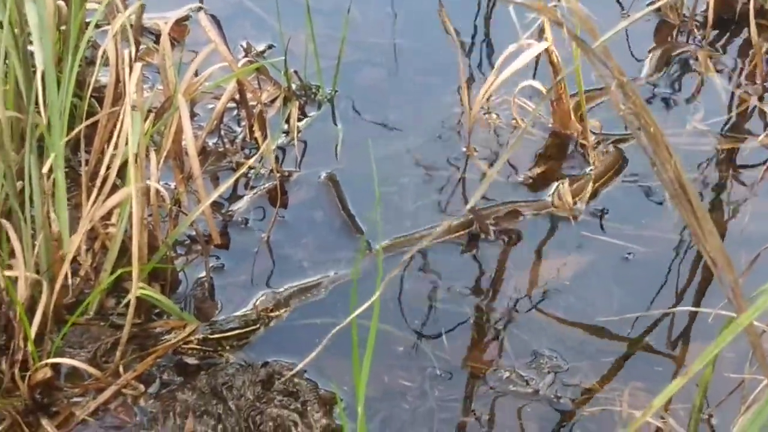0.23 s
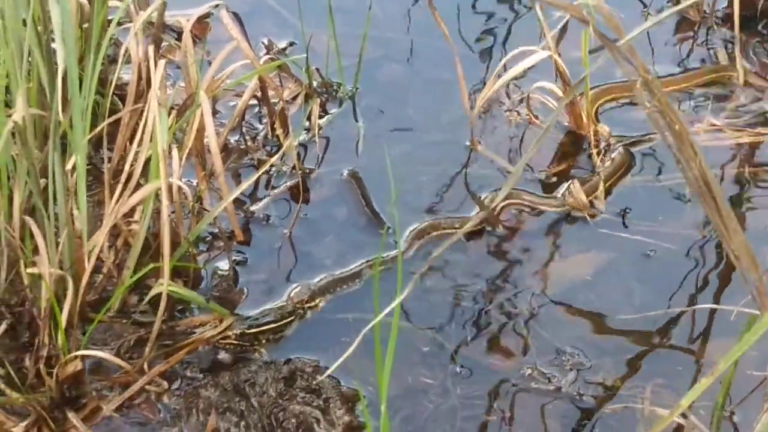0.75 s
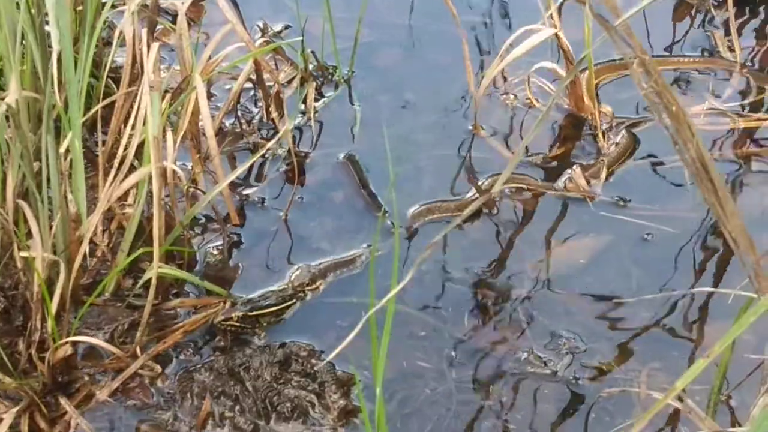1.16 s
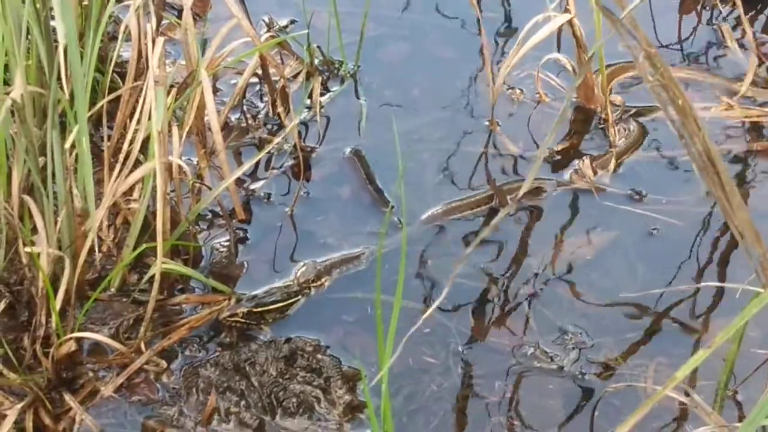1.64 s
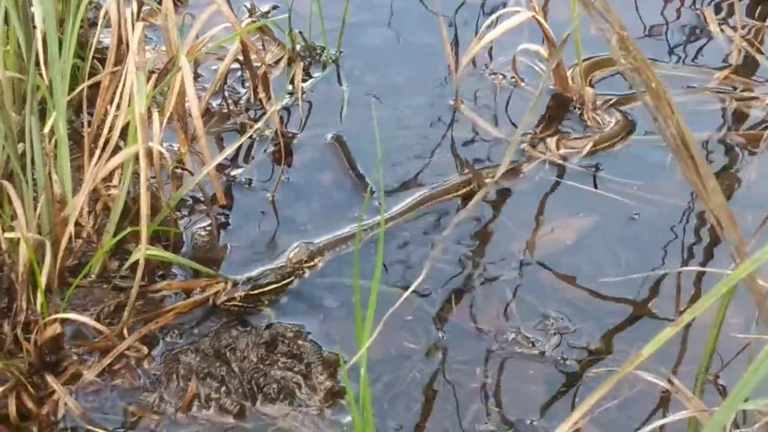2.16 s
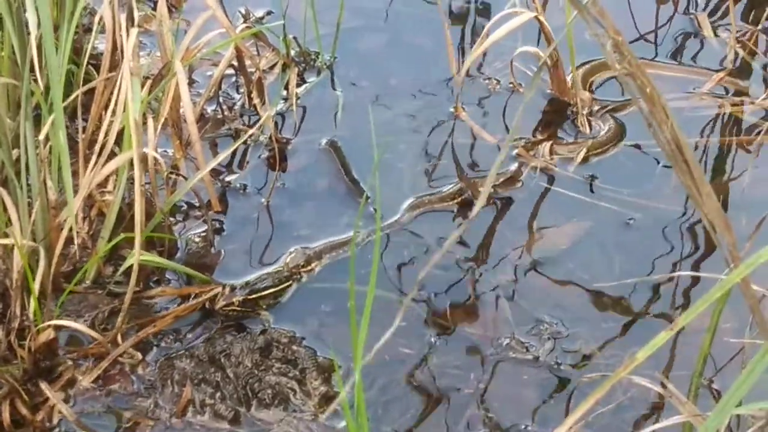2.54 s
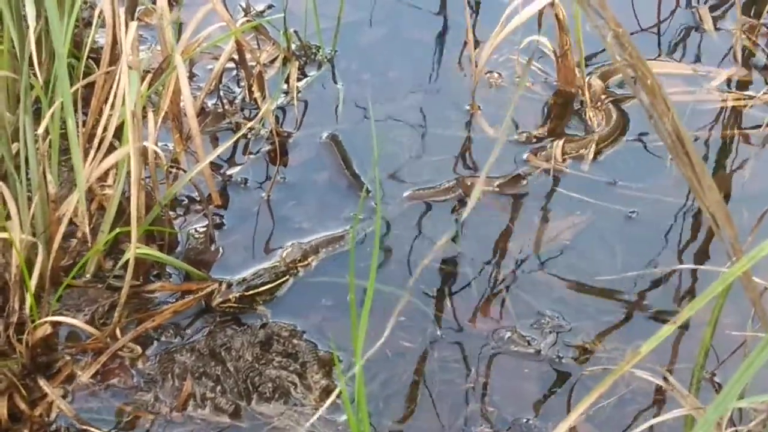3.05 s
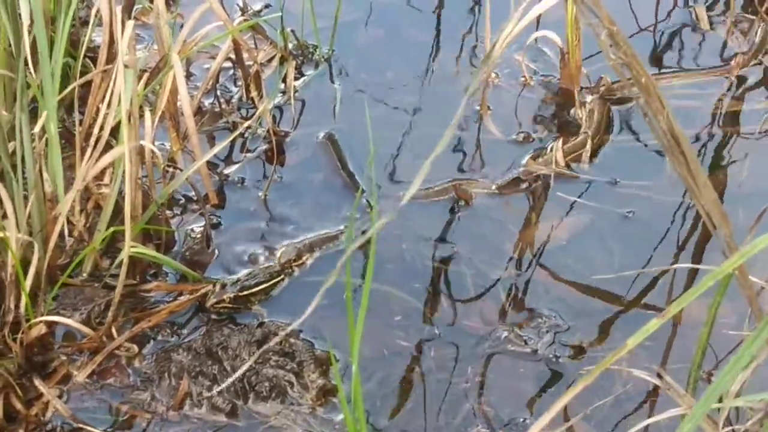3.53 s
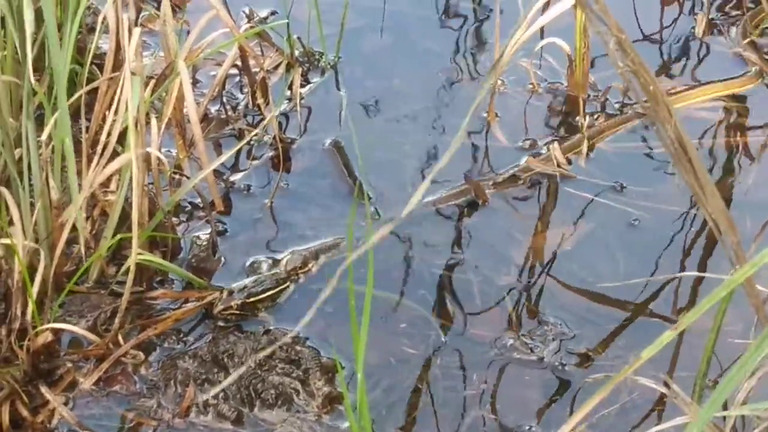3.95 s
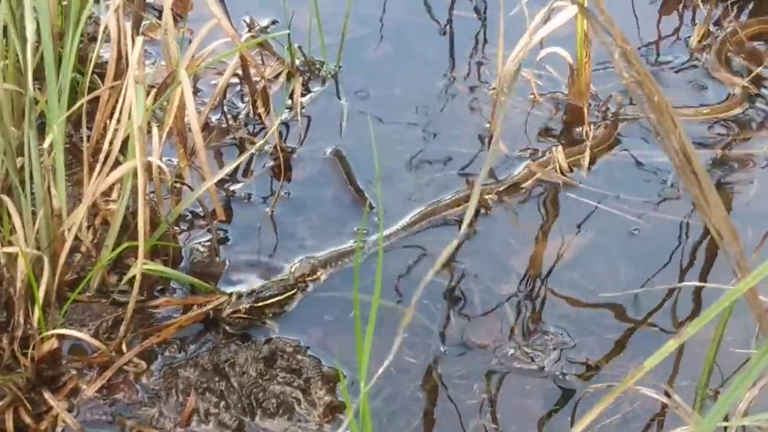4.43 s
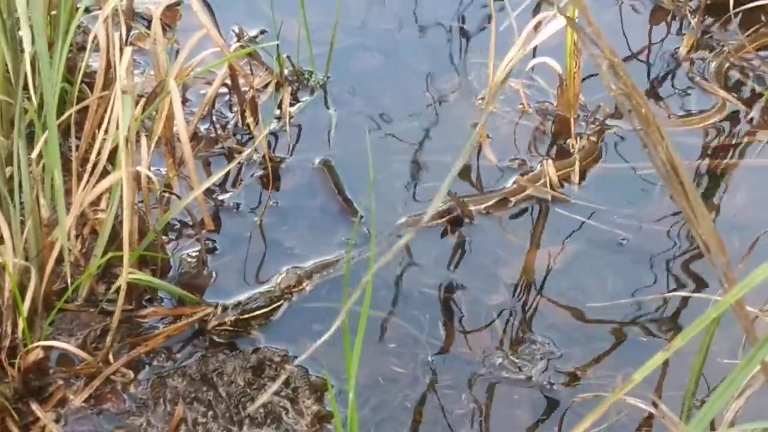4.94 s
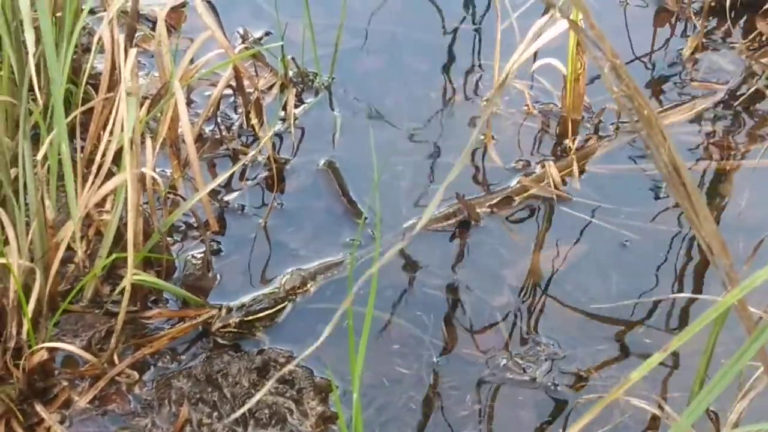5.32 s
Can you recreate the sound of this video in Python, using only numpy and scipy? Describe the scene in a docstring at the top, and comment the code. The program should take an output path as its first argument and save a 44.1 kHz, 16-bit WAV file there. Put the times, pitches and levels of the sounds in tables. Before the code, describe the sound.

Close stereo phone capture of a small frog's distress cries: thin whistling tones near three kilohertz, jumping and breaking into rasp, wrapped in bright airy hiss. The cries come in bursts with brief pauses, most crowded around two to three seconds. Afterwards only faint open-air hush, slight reed rustle, tiny clicks and dull wind thumps in the far channel remain, with a very faint puff near the end.

```python
"""A frog gripped by a snake screams at a reedy pond edge, a metre from a phone whose left port faces it.
Its vocal folds whistle, jump in pitch and break into rasp; pushes of air hiss and rasp through its throat.
Fine hiss and rustle swell, reeds tick with short rings, and band-limited noise makes wind buffet the far port.
Faint outdoor hush lies under it all; stems and water scatter the frog and reeds as decaying noise."""
import sys
import numpy as np
from scipy import signal
from scipy.fft import rfft, irfft
from scipy.io import wavfile
from scipy.ndimage import uniform_filter1d, map_coordinates

SR = 44100
rng = np.random.default_rng(int(sys.argv[2]) if len(sys.argv) > 2 else 0)


def master(y):
    """Save y as 16-bit WAV."""
    cut = np.clip(np.atleast_2d(y).T, -1, 1)
    pcm = np.round(cut * 32767)  # scale
    wavfile.write(sys.argv[1], SR, pcm.astype(np.int16))


N = 246078
TOP_HZ = 15900  # top of the phone's range

CLEAR, HUSKY, STRAINED, TORN = .07, .33, .6, .85  # roughness of the folds' swing, 0-1


def undb(db):
    """Amplitude factor for a level in dB."""
    return 10 ** (np.asarray(db) / 20)


def unit(x):
    """Scale to an RMS of 1."""
    return x / np.sqrt(np.mean(np.abs(x) ** 2))


def butter(x, order, hz, kind="low"):
    """Smooth-edged filter that keeps the lows, the highs or a band."""
    return signal.sosfilt(signal.butter(order, hz, kind, fs=SR, output="sos"), x)


def wobble(hz):
    """Smooth noise that changes about hz times a second."""
    return unit(butter(rng.standard_normal(N), 4, hz))


def ring(x, hz, width_hz):
    """Resonance with gain 1 at its centre."""
    return signal.lfilter(*signal.iirpeak(hz, hz / width_hz, fs=SR), x)


def steep_ring(x, hz, width_hz):
    """The same resonance twice over, for steeper sides, at an RMS of 1."""
    return unit(ring(ring(x, hz, width_hz), hz, width_hz))


def drift(x, sway_s=.0005):
    """A wandering delay bends every resonance up and down by some percent."""
    delayed = np.arange(N) + sway_s * SR * wobble(14)
    return map_coordinates(x, [delayed], order=2, mode="mirror")


def body(x, modes):
    """Steep resonances side by side, each drifting, coming and going."""
    total = 0
    for k, (hz, width_hz, db) in enumerate(modes):
        mode = drift(steep_ring(x, hz, width_hz)) * undb(3.8 * wobble(12))
        total = total + (-1) ** k * undb(db) * mode
    return unit(total)


def colour(x, hz, gain):
    """Gain by frequency, straight on a log axis."""
    axis = np.log(np.arange(N // 2 + 1) * SR / N + 1)
    return irfft(rfft(x) * np.interp(axis, np.log(hz), gain), N)


def open_between(start, end, fade_s):
    """Gate that is open from start to end, with short fades."""
    t = np.arange(N) / SR
    return np.clip(np.minimum(t - start, end - t) / fade_s + .5, 0, 1)


def play(tables, fade_s=.0015):
    """Columns of all tables on one time line, with a gate that is open while a table lasts."""
    gate = sum(open_between(rows[0][0], rows[-1][0], fade_s) for rows in tables)
    s, *columns = np.concatenate(tables).T
    t = np.arange(N) / SR
    return [np.minimum(gate, 1)] + [np.interp(t, s, column) for column in columns]


def swells(rows):
    """Gain of events that rise and fall at a steady number of dB a second."""
    t = np.arange(N) / SR
    total = 0
    for s, db, rise_s, fall_s in rows:
        total = total + undb(db - 10 * np.abs(t - s) / np.where(t < s, rise_s, fall_s))
    return total


def whine():
    """A thin tone near 9 kHz, slightly unsteady: noise through a narrow resonance."""
    return steep_ring(rng.standard_normal(N), 8960, 90)


def air():
    """Faint outdoor hush, different noise at each port, with a thin tone at the near one."""
    # colour of the hush before its bass is cut: (frequency [Hz], relative level [dB])
    hush_colour = [(18, -5), (30, -11), (90, -1.5), (439, -19), (2910, -22.5), (4170, -26), (7890, -22),
                   (8970, -13.5), (13500, -39)]
    hz, db = np.transpose(hush_colour)
    hush = colour(rng.standard_normal((2, N)), hz, undb(db))
    port_db = [[3], [-1]]  # near, far
    hush = unit(butter(hush, 2, 200, "high")) * undb(port_db)
    hush[0] += undb(-9) * whine()
    return undb(-77 + 1.5 * wobble(0.71)) * hush


def wind():
    """Each gust sets the far port thudding near 60 Hz; the sheltered port only flutters."""
    # gusts that strike the far port: (time [s], peak level before the last filter [dB])
    buffets = [(2.463, -53), (2.59, -53), (2.704, -52.5), (3.061, -34.5), (3.31, -40.5), (3.398, -43),
               (3.63, -40.5), (3.678, -36.5), (3.71, -35), (3.826, -51), (3.959, -34), (4.194, -41.5),
               (4.26, -39), (4.576, -51.5), (4.717, -36.5), (4.787, -42), (5.15, -50.5), (5.296, -44),
               (5.348, -33), (5.402, -48), (5.527, -34.5)]
    t = np.arange(N) / SR
    size = np.array([undb(-75.5 + 5 * wobble(4)), undb(-72 + 5.6 * wobble(3.6))])
    # six small gusts as the breeze gets up
    from_s, to_s, small_db, spread_db = 1.85, 2.9, -59, 2
    when, strength = rng.random((6, 2)).T
    small = zip(from_s + (to_s - from_s) * when, small_db + spread_db * (2 * strength - 1))
    for s, db in [*buffets, *small]:
        width_s = np.where(t < s, .012, .025)
        size[1] += undb(db) * np.exp(-((t - s) / width_s) ** 2)
    push = butter(ring(rng.standard_normal((2, N)), 62, 63), 2, 200)
    # the flow is kept at an even strength so that the gusts alone shape it
    push = size * push / np.sqrt(uniform_filter1d(push ** 2, size=2500))
    return butter(push, 2, [42, 105], "band")


def folds(notes, shake_hz):
    """A near sine, loudest where it meets the mouth resonance; strain trades steady swing for unsteady."""
    # overtones: (multiple of the pitch, level at a 3 kHz pitch [dB])
    overtones = [(2, -23), (3, -36.5)]
    # every second swing differs: (start [s], end [s], half-pitch lines re the note [dB])
    doubling = [(2.345, 2.385, -2), (3.04, 3.112, -10), (3.114, 3.15, 16), (3.152, 3.19, 3)]
    mouth_hz, mouth_width_hz, mouth_db = 2830, 320, 20

    gate, hz, db, rough = play([[(*point, strain) for point in note] for strain, note in notes])
    doubled, half_db = play([[(start, over), (end, over)] for start, end, over in doubling], fade_s=0.0053)
    phase = np.cumsum(2 * np.pi * hz * (1 + (0.0073 + .03 * rough) * wobble(90)) / SR)

    unsteady = (wobble(shake_hz) + 1j * wobble(shake_hz)) / np.sqrt(2)
    swing = np.sqrt(1 - rough ** 2) + rough * unsteady
    swing = swing * undb(2.6 * rough * wobble(180))  # strained folds open in bursts
    off_centre = 2 * (hz - mouth_hz) / mouth_width_hz
    mouth = np.sqrt(1 + undb(mouth_db) ** 2 / (1 + off_centre ** 2))
    tone = mouth * swing * np.exp(1j * phase)

    for k, over_db in overtones:
        # tighter folds close harder: overtones grow with pitch
        strength = undb(over_db + 9 * np.log2(hz / 3000)).clip(0, .5) * (k * hz < TOP_HZ)
        tone = tone + strength * swing ** 2 * np.exp(1j * k * phase)
    halves = np.cos(phase / 2) + .4 * np.cos(3 * phase / 2)
    size = uniform_filter1d(gate * undb(db), size=60)
    return np.sqrt(2) * size * (tone.real + doubled * undb(half_db) * halves)


def whistle():
    """The main vibration of the folds glides and jumps from note to note."""
    # notes: (roughness [0-1], points of (time [s], pitch [Hz], effort ahead of the mouth [dB]))
    notes = [ (STRAINED, [(0.019, 2750, -60), (0.06, 2950, -52), (0.095, 3400, -33), (0.19, 3480, -30),
             (0.25, 3150, -40), (0.322, 2750, -50), (0.35, 2600, -85)]), (TORN, [(0.976, 3410, -53.5),
             (1.015, 3500, -36), (1.08, 3800, -36), (1.1, 3800, -27), (1.15, 3750, -28.5),
             (1.204, 3584, -47)]), (STRAINED, [(1.411, 3250, -80), (1.44, 3250, -88), (1.466, 3000, -68)]),
             (CLEAR, [(1.469, 4667, -49), (1.478, 4096, -31), (1.492, 4332, -49.5)]),
             (HUSKY, [(1.525, 2650, -56.5), (1.544, 3260, -41.5)]), (HUSKY, [(1.585, 3600, -66),
             (1.62, 3130, -58), (1.634, 3050, -68)]), (STRAINED, [(1.636, 3080, -66), (1.69, 2950, -76),
             (1.75, 2580, -78), (1.772, 2500, -90), (1.79, 2800, -70), (1.81, 3100, -62)]),
             (TORN, [(1.815, 3400, -53), (1.868, 3680, -34), (2.022, 3561, -48.5)]),
             (CLEAR, [(2.028, 3350, -46), (2.052, 3680, -30), (2.062, 3520, -36), (2.076, 3350, -42)]),
             (TORN, [(2.078, 3350, -40.5), (2.128, 3618, -38), (2.174, 3221, -40.5)]),
             (TORN, [(2.19, 2970, -61), (2.209, 2516, -54), (2.222, 2400, -75)]),
             (STRAINED, [(2.293, 3100, -40), (2.305, 3800, -38), (2.345, 3900, -34)]),
             (HUSKY, [(2.347, 3700, -33), (2.362, 3370, -29.5), (2.384, 3510, -37.5)]),
             (CLEAR, [(2.385, 2857, -33), (2.391, 2890, -28.5), (2.4, 3050, -42), (2.418, 3280, -40),
             (2.444, 3450, -39.5)]), (STRAINED, [(2.45, 4130, -46), (2.484, 3800, -42), (2.494, 4100, -39),
             (2.512, 3650, -47)]), (STRAINED, [(2.513, 3250, -42), (2.535, 3150, -37), (2.557, 3100, -40)]),
             (HUSKY, [(2.56, 3142, -41), (2.578, 3114, -31), (2.607, 2930, -37), (2.616, 2860, -31),
             (2.629, 2830, -29), (2.634, 2821, -40), (2.642, 2800, -38)]), (HUSKY, [(2.644, 2542, -37),
             (2.669, 2673, -28), (2.68, 2430, -53)]), (HUSKY, [(2.687, 3840, -50.5), (2.7, 2200, -58)]),
             (CLEAR, [(2.921, 3140, -60), (2.93, 2860, -33.5), (2.936, 2820, -47)]),
             (CLEAR, [(2.938, 3430, -39.5), (2.958, 3151, -48.5), (2.968, 2770, -35), (2.981, 2665, -29),
             (3.002, 2830, -37.5), (3.03, 3565, -41)]), (HUSKY, [(3.031, 3565, -41), (3.065, 3720, -44),
             (3.085, 3500, -48), (3.112, 4000, -52)]), (HUSKY, [(3.114, 3480, -68), (3.149, 3460, -68)]),
             (HUSKY, [(3.151, 3360, -56), (3.158, 3674, -46), (3.181, 3654, -58)]),
             (CLEAR, [(3.183, 3600, -54), (3.2, 3060, -48), (3.212, 2724, -29.5), (3.223, 2430, -43),
             (3.24, 2378, -30), (3.257, 1990, -40)]), (STRAINED, [(3.259, 2350, -38), (3.297, 2130, -29),
             (3.31, 1950, -31)]), (HUSKY, [(3.311, 1880, -32), (3.328, 1760, -33), (3.34, 1700, -54),
             (3.362, 1796, -46), (3.374, 1880, -59)]), ]
    return folds(notes, shake_hz=470)


def pushes(fade_s=.0043):
    """Each push swells along an arch to its peak, sags, and shuts; its treble tilt falls off with it."""
    # pushes of air: (start [s], peak [s], end [s], peak hiss [dB], swell [dB], sag [dB],
    # treble tilt of the hiss at the peak [dB per octave], steady throat rasp [dB])
    screams = [(0.02, .18, .35, -22.5, 42, 26, -12, -62), (.958, 1.13, 1.203, -20, 17, 10, 3, -80),
               (1.208, 1.26, 1.31, -62, 3, 15, -5, -72), (1.469, 1.5, 1.525, -38, 12, 12, -3, -60),
               (1.525, 1.538, 1.544, -34.5, 15, 1, -3, -61), (1.798, 1.868, 2.03, -26, 30, 8, 0, -53),
               (2.03, 2.12, 2.178, -30, 6, 3, -2, -50), (2.178, 2.205, 2.235, -42, 8, 20, -4, -62),
               (2.293, 2.35, 2.42, -35, 6, 13, -1, -52), (2.42, 2.47, 2.7, -38, 10, 7, -10, -52),
               (2.921, 2.93, 3.14, -43, 7, 6, -3, -54), (3.14, 3.16, 3.41, -44, 2, 40, -1, -68),
               (5.5, 5.54, 5.58, -63, 17, 7, 3, -68)]
    # the throat catches and rasps: (peak [s], peak level [dB], its lowest resonance [dB],
    # time to rise 10 dB [s], time to fall 10 dB [s])
    catches = [(.2, -35, -54, .3, .12), (1.13, -29.5, -43, .04, .035), (2.12, -52, -66, .3, .3),
               (2.345, -32, -58, .03, .024), (2.634, -36, -57, .03, .06), (3.047, -26, -58, .005, .005),
               (3.148, -34, -62, .009, .005), (3.29, -42, -51, .03, .05)]
    dull_per_db = .45  # tilt lost, in dB per octave, for each dB below the peak of a push
    t = np.arange(N) / SR
    hiss, tilt_db, rasp, low = 0, 0, 0, 0
    for start, peak, end, db, swell_db, sag_db, peak_tilt_db, rasp_db in screams:
        on = open_between(start, end, fade_s)
        rising_db = swell_db * ((peak - t) / (peak - start)) ** 2
        falling_db = sag_db * ((t - peak) / (end - peak)) ** 2
        arch_db = np.where(t < peak, rising_db, falling_db)
        hiss = hiss + on * undb(db - arch_db)
        rasp = rasp + on * undb(rasp_db)
        tilt_db = tilt_db + on * (peak_tilt_db - dull_per_db * arch_db)
    # a catch sounds only while the push that holds it lasts
    for s, db, low_db, rise_s, fall_s in catches:
        start, end = next((row[0], row[2]) for row in screams if row[2] > s)
        catch = open_between(start, end, fade_s) * swells([(s, 0, rise_s, fall_s)])
        rasp = rasp + undb(db) * catch
        low = low + undb(low_db) * catch
    return hiss, tilt_db, rasp, low


def breath():
    """Irregular puffs through the strained folds ring the throat; in the mouth they hiss and whistle."""
    # throat resonances, lowest first: (centre [Hz], width [Hz], relative level [dB])
    throat = [(1200, 1500, 0), (1775, 140, -10.5), (2300, 300, -2), (2774, 220, 1), (3470, 1800, -6)]
    # mouth hiss bands: (centre [Hz], width [Hz], relative level [dB])
    hiss_bands = [(4700, 1500, -13), (6070, 1000, -17.5), (8610, 3300, -3.5), (10500, 2900, -4),
                  (12300, 1500, -11.5), (15000, 2000, -15)]
    push, tilt_db, rasp, low = pushes()
    puffs = rng.standard_normal(N) * undb(2.6 * wobble(220))
    hiss = 0
    for hz, width_hz, db in hiss_bands:
        # an unsteady whistle comes and goes in each band
        strand_hz = hz * (1 + .05 * wobble(14) + .012 * wobble(300))
        strand = np.sin(np.cumsum(2 * np.pi * strand_hz / SR))
        band = steep_ring(puffs, hz, width_hz) + undb(-9 + 4 * wobble(20)) * strand
        # treble tilt, set for each push and falling off away from its peak
        treble_db = tilt_db * np.log2(hz / 8500).clip(0)
        hiss = hiss + undb(db + treble_db + 2.5 * wobble(16)) * band
    hiss = butter(hiss, 4, 3300, "high")
    return push * hiss + rasp * body(puffs, throat[1:]) + low * body(puffs, throat[:1])


def reeds():
    """Fine-grained noise swells as hiss and rustle, a thin tone with it; now and then a dry stem snaps."""
    # swells of fine hiss and rustle, some lingering after a scream:
    # (peak [s], level [dB], time to rise 10 dB [s], time to fall 10 dB [s])
    rustle = [(.35, -54, .01, .06), (.538, -58.5, .004, .11), (.826, -59, .004, .04),
              (1.211, -43.5, .004, .1), (1.546, -47.5, .004, .057), (1.79, -62, .12, .02),
              (2.227, -50, .004, .2), (2.702, -43, .004, .06), (2.919, -50.5, .05, .02),
              (3.6, -60, .015, .25), (4.07, -71, .15, .17), (5.05, -61, .02, .2), (5.178, -54, .08, .18),
              (5.537, -60.5, .05, .05)]
    # snapping stems: (time [s], level ahead of the ring's envelope [dB], ring [Hz])
    ticks = [(0.82, -36, 9130), (1.268, -14.5, 8980), (3.639, -34.5, 7410), (4.113, -47, 985),
             (5.176, -29, 5550), (5.315, -35, 8990)]
    grains = rng.standard_normal(N) * undb(1.5 * wobble(60))
    fine = body(grains, [(6300, 2200, -3.5), (9020, 1000, 6), (10700, 600, -10.5)])  # Hz, width Hz, dB
    out = swells(rustle) * (fine + .7 * whine())
    t = np.arange(900) / SR
    for s, db, hz in ticks:
        # a few cycles of ring; the higher the stem rings, the more it cracks
        crack = ring(rng.standard_normal(len(t)), 10000, 7000) * np.exp(-t / .0005)
        envelope = np.exp(-t * hz / 5) * (1 - np.exp(-t * hz)) ** 2
        snap = .15 * crack * (hz / 6000) ** 2 + np.sin(2 * np.pi * hz * t) * envelope
        first = int(s * SR)
        out[first:first + len(t)] += undb(db) * snap
    return out


def second_voice():
    """Higher or lower lines sounding beside the main note, made as the main note is."""
    # lines: (roughness [0-1], points of (time [s], pitch [Hz], effort ahead of the mouth [dB]))
    second_notes = [ (HUSKY, [(0.958, 9680, -56.5), (0.971, 10660, -27), (1.005, 9400, -31.5)]),
                    (STRAINED, [(1.007, 9300, -30), (1.034, 9200, -17), (1.056, 8530, -21),
                    (1.076, 9030, -25.5), (1.1, 8790, -36.5)]), (CLEAR, [(1.49, 5610, -37.5),
                    (1.501, 5040, -39.5), (1.516, 5760, -38), (1.54, 5800, -48)]),
                    (STRAINED, [(1.801, 5200, -54), (1.85, 6100, -36), (1.88, 5950, -31),
                    (1.91, 4900, -33)]), (STRAINED, [(1.925, 5300, -40), (1.965, 7900, -34),
                    (1.972, 8000, -45)]), (STRAINED, [(2.1, 6760, -34.5), (2.14, 4800, -39.5),
                    (2.169, 5110, -35.5)]), (STRAINED, [(2.293, 2900, -50), (2.32, 2850, -55),
                    (2.355, 2700, -47), (2.38, 2750, -60)]), (STRAINED, [(2.44, 2650, -62),
                    (2.47, 2900, -56), (2.492, 3100, -52)]), (STRAINED, [(2.51, 2900, -56),
                    (2.56, 2850, -52)]), (HUSKY, [(2.985, 1800, -58), (3.035, 1720, -54)]), ]
    return folds(second_notes, shake_hz=506)


def scatter(x, t60_s):
    """Dense reflections from stems and water: noise that falls 60 dB in t60_s."""
    t = np.arange(int(.5 * SR)) / SR
    tail = rng.standard_normal(len(t)) * 1000 ** (-t / t60_s)
    return signal.fftconvolve(x, tail / np.linalg.norm(tail))[:N]


def ports(near):
    """The near port faces the sound; the phone shadows the far one, and the banks answer at both."""
    # far port: (frequency [Hz], level re near port [dB], share of power arriving directly [0-1])
    shadow = [(700, -3.5, 0.17), (2000, -4.5, 0.32), (2960, -15, .65), (5550, -1.5, 0.067),
              (8000, -20, .15), (15680, -19, .15)]
    hz, db, direct = np.transpose(shadow)
    # the direct sound arrives round the edge, a sample late and inverted; the rest is scattered
    far = -colour(np.roll(near, 1), hz, undb(db) * np.sqrt(direct))
    far += colour(scatter(near, t60_s=.045), hz, undb(db) * np.sqrt(1 - direct))
    banks = [scatter(near, t60_s=.2), colour(scatter(near, t60_s=.2), hz, undb(db))]
    return np.array([near, far]) + undb(-26.5) * np.array(banks)


def scene():
    """Frog and reeds reach both ports, over the air and the wind."""
    frog = whistle() + second_voice() + breath()
    # so small a body gives off no bass
    near = butter(frog, 5, 850, "high") + reeds()
    return ports(near) + air() + wind()


def record(dry):
    """The phone cuts the top with a steep low-pass."""
    return signal.sosfilt(signal.ellip(10, .2, 80, TOP_HZ, fs=SR, output="sos"), dry)


dry = scene()
out = record(dry)
master(out)
```